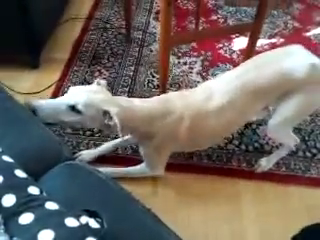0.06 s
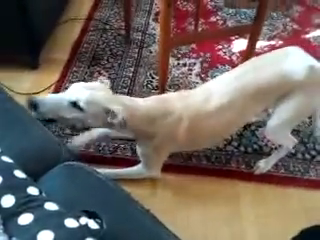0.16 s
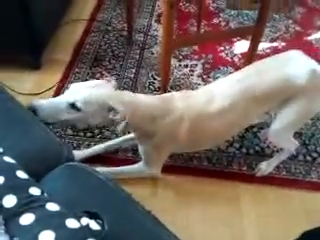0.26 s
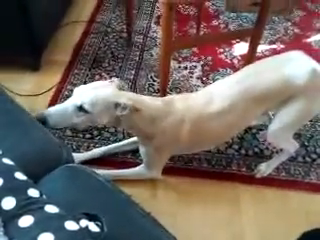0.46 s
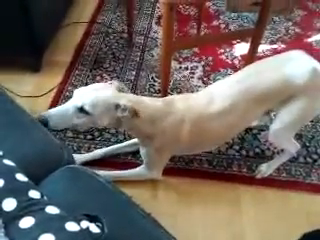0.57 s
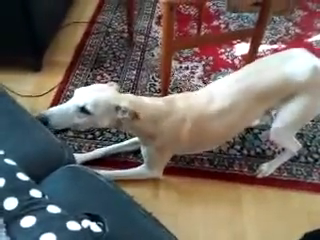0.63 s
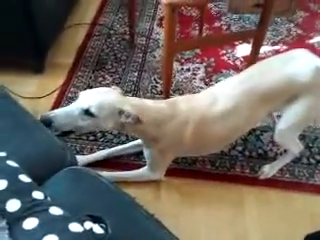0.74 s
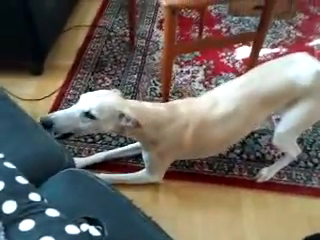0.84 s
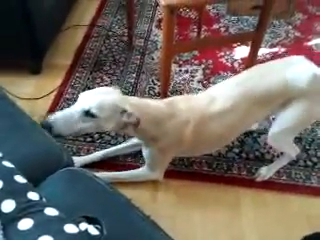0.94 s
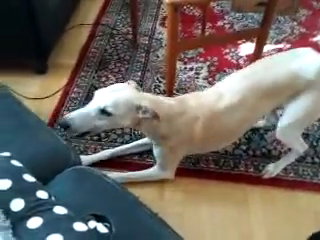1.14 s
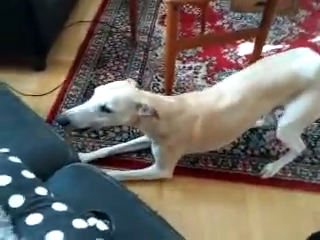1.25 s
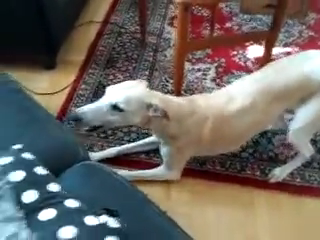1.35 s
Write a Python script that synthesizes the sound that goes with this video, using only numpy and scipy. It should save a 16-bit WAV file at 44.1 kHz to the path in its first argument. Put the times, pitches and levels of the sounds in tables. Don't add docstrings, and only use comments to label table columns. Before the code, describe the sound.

Two playful dog barks, each gliding upward with harsh breathy edges, close to a small overloading microphone; soft grumbling before the first, an audible inhale before the second, room ringing after each over low background hush.

```python
import sys
import numpy as np
from scipy import signal
from scipy.io import wavfile
from scipy.ndimage import uniform_filter1d

SR = 44100
rng = np.random.default_rng(int(sys.argv[2]) if len(sys.argv) > 2 else 0)


def file_out(sig):
    cols = np.atleast_2d(sig).T
    lim = np.clip(cols, -1, 1)
    pcm = np.round(lim * 32767).astype(np.int16)
    wavfile.write(sys.argv[1], SR, pcm)


def rack_gain(trim_db):
    fader = np.asarray(trim_db, float)
    return 10 ** (fader / 20)


N = 61739


def evened(x):
    return x / np.sqrt(np.mean(x ** 2) + 1e-20)


def read(points, hz):
    f, value = np.transpose(points)
    return np.interp(np.log(hz + 1), np.log(f + 1), value)


def envelope(points):
    s, db = np.transpose(points)
    return rack_gain(np.interp(np.arange(N) / SR, s, db, left=-120, right=-120))


def band(x, hz, kind, order=4):
    return signal.sosfilt(signal.butter(order, hz, kind, fs=SR, output="sos"), x)


def resonate(x, hz, width):
    turn = np.exp(2j * np.pi * np.cumsum(hz * np.ones(len(x))) / SR)
    r = np.exp(-np.pi * width / SR)
    return 2 * (turn * signal.lfilter([1 - r], [1, -r], x / turn + 1e-18)).real


def hiss(colour, patchy_db):
    frames, hz = N // 128 + 5, np.fft.rfftfreq(512, 1 / SR)
    a, b, patch = rng.standard_normal((frames, 257, 3)).T
    patch = uniform_filter1d(patch, size=4, axis=0)
    patch = evened(uniform_filter1d(patch, size=10, axis=1))
    z = (a + 1j * b) * rack_gain(read(colour, hz)[:, None] + patchy_db * patch)
    return evened(signal.istft(z, nperseg=512, noverlap=384)[1][:N])


def grumble():
    # time in seconds, level in dB.
    grumble_swell = [
        (0, -47.5),
        (.04, -63),
        (.075, -52.5),
        (.11, -53),
        (.15, -65),
        (.2, -59),
        (.23, -35),
    ]
    pulses_per_s = 85
    wander = evened(uniform_filter1d(rng.standard_normal(N), size=600))
    turns = np.cumsum(pulses_per_s * (1 + 0.083 * wander)) / SR
    drive = np.diff(np.floor(turns), prepend=0) + 0.024 * rng.standard_normal(N)
    body = resonate(drive, 290, 170)
    body = body + 0.2 * resonate(drive, 560, 250) + 0.21 * resonate(drive, 120, 100)
    return envelope(grumble_swell) * evened(body)


def earlier_tail():
    # frequency in Hz, level in dB.
    tail_colour = [(350, -11), (650, -4.5), (1000, -35), (1440, -7.5), (2400, -5), (4180, -5),
                   (6000, -24.5), (8500, -11)]
    start_db, fall_db_per_s = -49, 70
    return rack_gain(start_db - fall_db_per_s * np.arange(N) / SR) * hiss(tail_colour, patchy_db=2.2)


def hush():
    # frequency in Hz, level in dB.
    hush_colour = [(25, 1), (120, -18.5), (700, -9.5), (1000, -14.5), (1300, -23.5), (2400, -9),
                   (5000, -23), (8500, -23.5)]
    return rack_gain(-62) * hiss(hush_colour, patchy_db=1.2)


def bark(rows, chest_db, bright):
    # frequency in Hz, width in Hz, level in dB.
    throat = [(640.2, 81.3, 5), (1201, 184, -1.5), (1986, 205, -2.5), (2309, 156, 0.5), (2700, 420, -8.5)]
    s, *cols = np.transpose(rows)
    t = np.arange(s[0], s[-1], 1 / SR)
    hz, db, sub, mouth = (np.interp(t, s, c) for c in cols)
    a, b = rng.standard_normal((N, 2))[:len(t)].T
    over = db - db.max()
    sub = np.clip(sub, 0, 2)

    rough = np.clip(0.2 - 0.014 * over, 0, 0.6)
    jitter = 0.016 * evened(uniform_filter1d(a, size=120))
    turns = np.cumsum(hz * (1 + jitter)) / SR
    folds = sum(np.cos(2 * np.pi * k * turns) for k in range(1, 20))
    folds = folds * (1 + sub * np.cos(np.pi * turns))
    breath = (0.2 + np.exp(-(turns % 1) / 0.9)) * b
    drive = (1 - rough) * evened(folds) + rough * evened(breath)

    voice = 0
    for k, (f, w, g) in enumerate(throat):
        follow = 0.1 if k else 1
        at_hz = f * (1 + (mouth - 1) * follow)
        gain = (-1) ** k * rack_gain(g + (k > 0) * bright * over)
        voice = voice + gain * resonate(resonate(drive, at_hz, 2.04 * w), at_hz, 1.63 * w)
    voice = band(band(evened(voice), 294, "high"), 3300, "low", order=3)

    chest = rack_gain(chest_db) * np.sin(2 * np.pi * turns)
    half_pitch_db = np.where(hz < 300, -8, -31) - 0.14 * over
    chest = chest + rack_gain(half_pitch_db) * sub ** 2 * np.sin(np.pi * turns)
    chest = chest + rack_gain(-9) * sub * (hz >= 300) * np.sin(3 * np.pi * turns)

    out, at = np.zeros(N), round(s[0] * SR)
    closing = np.minimum((s[-1] - t) / 0.0013, 1)
    out[at:at + len(t)] = rack_gain(db) * (voice + chest) * closing
    return out


def first_bark():
    # time in seconds, pitch in Hz, effort in dB, strong-weak pulse share (0 is even),
    # mouth opening (1 is the resting throat).
    first_glide = [
        (.208, 246, -55, 1.1, 1),
        (.226, 264.6, -28, 0.05, 0.73),
        (.245, 294.1, -24.5, 0.98, 0.99),
        (.252, 293.9, -15, 0, 0.97),
        (.283, 328.9, -18.5, 0.13, 1.04),
        (.303, 373.3, -14.5, .05, 0.86),
        (.335, 383.6, -17.5, 0.4, 1.05),
        (.35, 371.3, -22, 0.5, 0.77),
        (.385, 357.3, -27, 1, .82),
    ]
    return bark(first_glide, chest_db=-26.5, bright=0.4)


def crackle_bursts():
    # start in seconds, length in seconds, level in dB.
    bursts = [
        (0.222, 0.042, -52.5),
        (0.242, 0.053, -36.5),
        (0.263, 0.03, -29.5),
        (0.292, 0.037, -26.5),
        (0.318, 0.058, -35),
        (0.936, 0.033, -31.5),
        (0.966, .055, -25.5),
        (1.026, 0.006, -32),
    ]
    t = np.arange(N) / SR
    shape = 0
    for s, length, db in bursts:
        shape = shape + rack_gain(db) * np.sin(np.pi * np.clip((t - s) / length, 0, 1)) ** 0.6
    grains_per_s = 840
    grit = (rng.random(N) < grains_per_s / SR) * rng.exponential(1, N)
    grit = uniform_filter1d(grit, size=70)
    crackle = (2 + evened(grit)) * rng.standard_normal(N)
    crackle = band(band(crackle, 2830, "high"), 6300, "low", order=3)
    buffet = band(band(rng.standard_normal(N), 97, "low", order=1), 27, "high", order=1)
    return shape * evened(crackle), shape * rack_gain(-20) * evened(buffet)


def drawn_air():
    # time in seconds, level in dB.
    air_swell = [
        (.6, -114),
        (.7, -59),
        (.78, -53.5),
        (.83, -50.5),
        (.875, -48),
        (.9, -53),
        (.92, -71),
        (1.3, -77),
        (1.36, -60.5),
        (1.41, -51.5),
    ]
    # frequency in Hz, level in dB.
    air_colour = [(100, -35.5), (400, -22.5), (700, -5), (960, -12), (1300, -8), (2300, -1.5), (3200, -8),
                  (3900, -4), (5000, -36), (7300, -19)]
    return envelope(air_swell) * hiss(air_colour, patchy_db=2.2)


def second_bark():
    # time in seconds, pitch in Hz, effort in dB, strong-weak pulse share (0 is even),
    # mouth opening (1 is the resting throat).
    second_glide = [
        (.905, 177.5, -35.5, 0.34, 1.05),
        (.917, 240.5, -20.5, 0.22, 0.935),
        (.94, 310.7, -14, .1, 1.04),
        (.957, 333.4, -20.5, .1, 0.96),
        (.98, 392.2, -12.5, .05, 0.99),
        (1.005, 400, -16.5, .1, 0.96),
        (1.016, 382.5, -20.5, 1.73, 0.73),
        (1.04, 377.6, -29.5, 0.48, 0.93),
        (1.078, 370.4, -27.5, 1.2, 0.73),
    ]
    return bark(second_glide, chest_db=-42, bright=0.15)


def room(x):
    # frequency in Hz, time to fall by 60 dB in seconds.
    ring_times = [(150, 0.82), (370, 0.38), (560, 0.4), (900, 0.34), (1300, .6), (2200, 0.7), (3000, 0.73),
                  (4800, 0.76), (6500, 0.43)]
    # delay in seconds, level in dB.
    floor_echoes = [(.0005, -15.5), (.0034, -21), (.0062, -16.5), (.0105, -12), (.014, -7.5)]
    taps = np.zeros(SR)
    at = np.arange(560, SR - 20, 20) + rng.integers(0, 20, (SR - 561) // 20)
    taps[at] = rng.choice([-1., 1.], at.shape)
    hz, t, z = signal.stft(taps, SR, nperseg=256)
    decay = rack_gain(-60 * t / read(ring_times, hz)[:, None])
    tail = signal.istft(z * decay, SR, nperseg=256)[1]
    tail = rack_gain(-4) * tail / np.linalg.norm(tail)
    tail = tail - 0.92 * resonate(tail, 5000, 1600)
    tail[0] += 1
    for k, (s, db) in enumerate(floor_echoes):
        tail[round(s * SR)] += (-1) ** k * rack_gain(db)
    return signal.fftconvolve(x, tail)[:N] * 0.67


def scene():
    harsh, buffet = crackle_bursts()
    dog = room(grumble() + first_bark() + second_bark() + 0.65 * harsh)
    at_microphone = 0.34 * harsh + buffet
    return (dog + at_microphone + drawn_air() + earlier_tail() + hush())[None]


def band_limit(x):
    return signal.sosfilt(signal.butter(12, 9080, fs=SR, output="sos"), x)


def record(dry):
    clip_at, lopside = 0.42, 0.03
    push = dry[0] / clip_at
    bent = clip_at * np.tanh(push + lopside * push ** 2)
    bent = bent - 0.66 * resonate(bent, 959, 140)
    mix = band(band(bent, 6855, "low", order=9), 22, "high", order=1)
    return band_limit(mix[None])


dry = scene()
out = record(dry)
file_out(out)
```